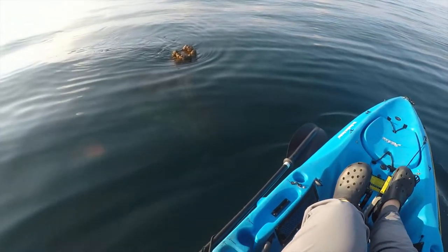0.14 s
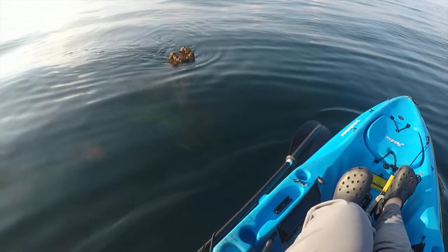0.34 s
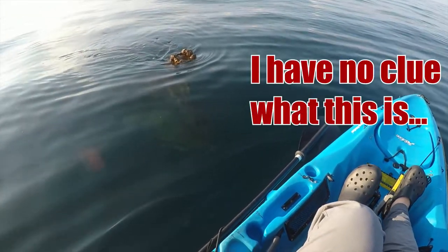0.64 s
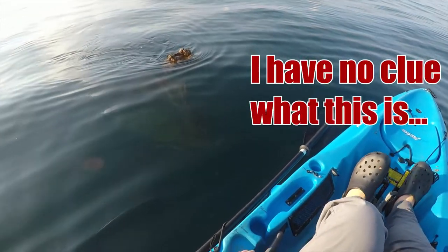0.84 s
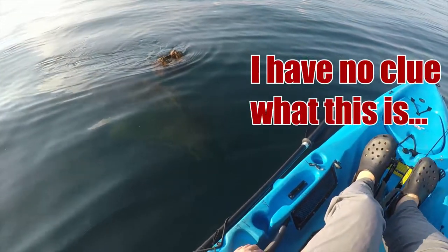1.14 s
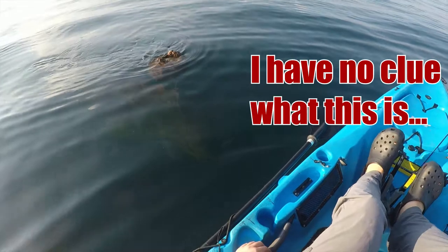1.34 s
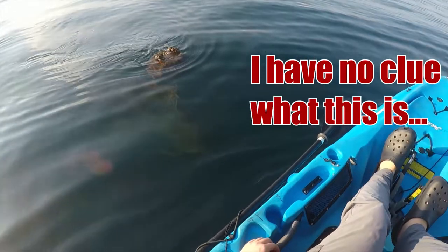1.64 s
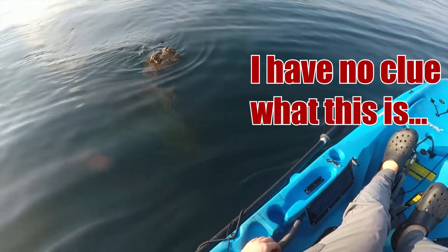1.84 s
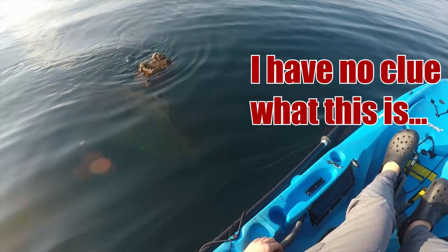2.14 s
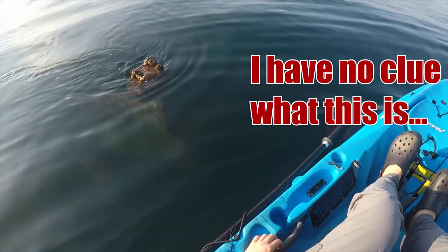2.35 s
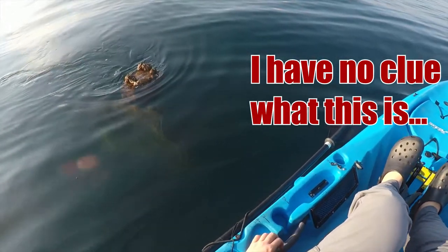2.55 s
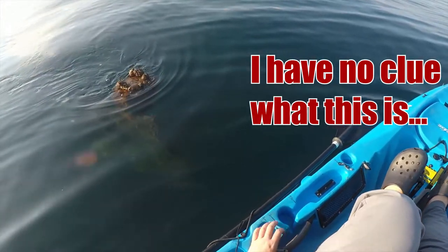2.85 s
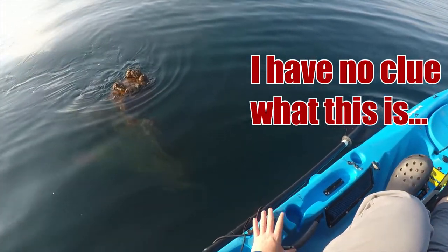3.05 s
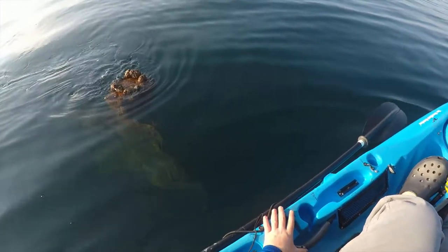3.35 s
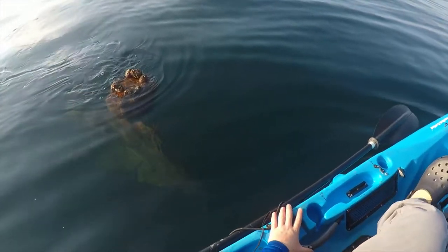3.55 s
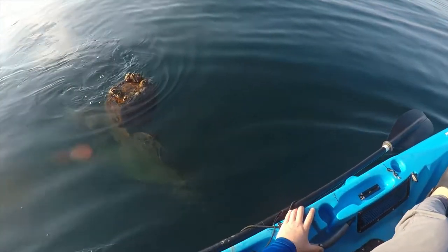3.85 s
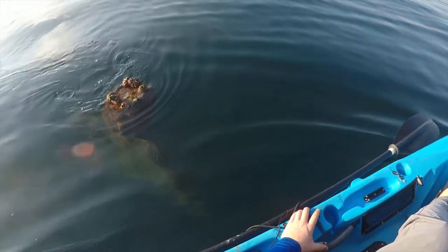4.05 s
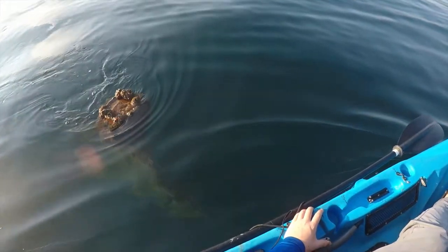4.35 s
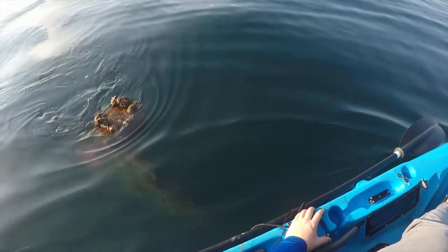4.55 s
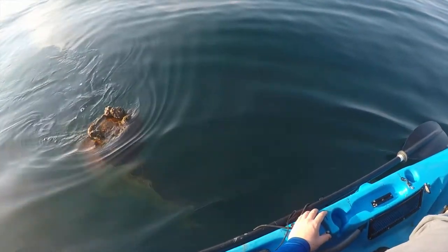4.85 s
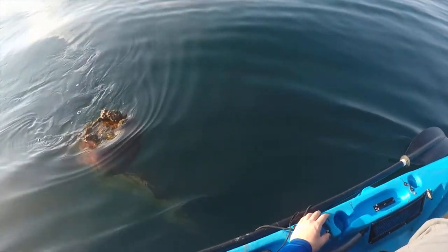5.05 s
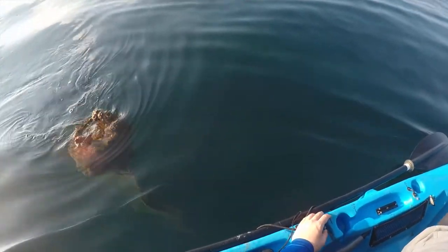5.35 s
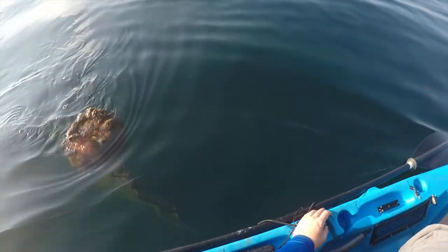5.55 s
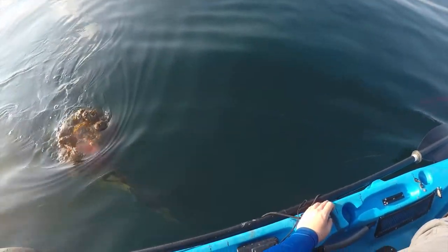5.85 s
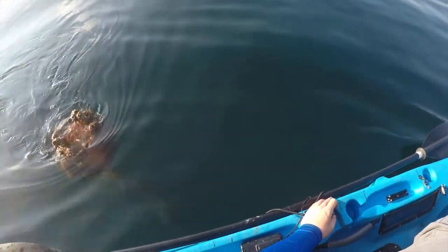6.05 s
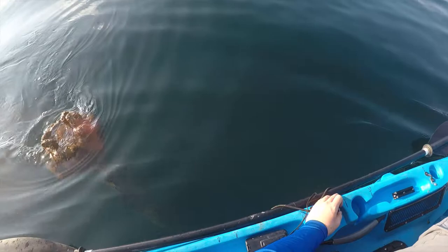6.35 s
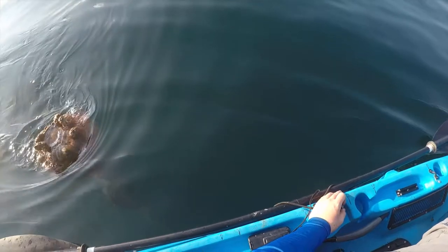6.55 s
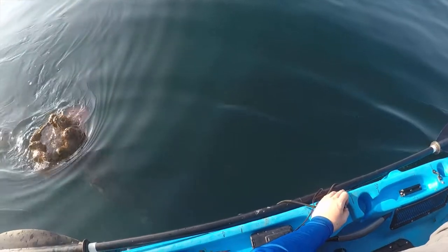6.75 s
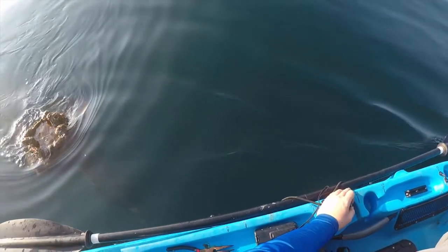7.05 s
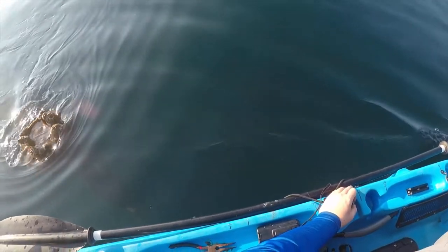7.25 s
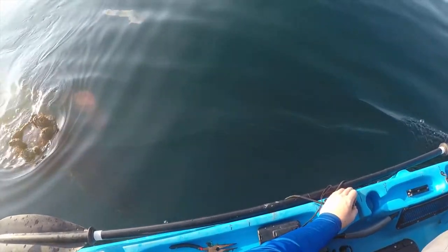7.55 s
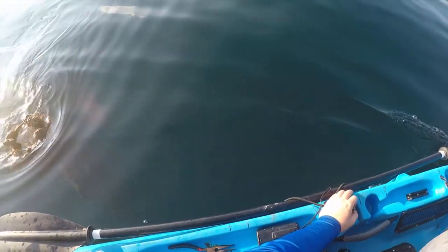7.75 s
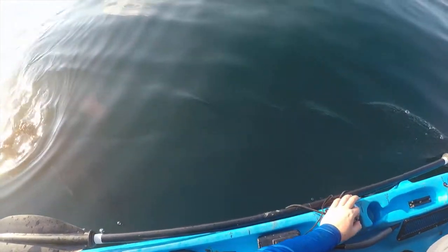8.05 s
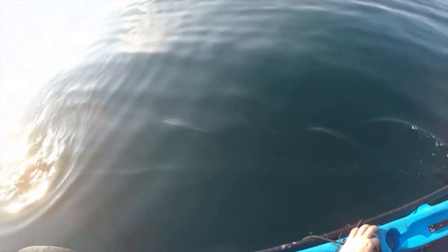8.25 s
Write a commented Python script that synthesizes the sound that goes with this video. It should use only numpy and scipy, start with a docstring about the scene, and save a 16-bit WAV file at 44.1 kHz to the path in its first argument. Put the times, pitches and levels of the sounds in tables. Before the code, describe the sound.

A plastic kayak rocks on calm water, its hull thumping softly amid drips and trickles, with a few creaks, a squeak and knocks.

```python
"""Hollow thumps, plops and drips round a plastic kayak rocking on calm water, heard from aboard.
Ripples trap air pockets that boom under the hull, and small bubbles ring along the waterline.
As weight shifts, the seat and gear creak in runs of stick-slip snaps, rubber squeaks over the deck
and gear knocks on the plastic. Faint open-air hiss and a low hull hum lie underneath."""
import sys
import numpy as np
from scipy import signal
from scipy.fft import rfft, irfft
from scipy.io import wavfile
from scipy.ndimage import uniform_filter1d

SR = 44100
rng = np.random.default_rng(int(sys.argv[2]) if len(sys.argv) > 2 else 0)


def transcribe(u):
    """Save the signal u as a 16-bit wav file named by the first command-line argument.

    u: samples, shape (n,) or (channels, n), limited to [-1, 1]; the rate is SR.
    q: integer samples, one column per channel.
    """
    v = np.clip(np.atleast_2d(u).T, -1, 1)
    q = np.round(v * 32767).astype(np.int16)
    wavfile.write(sys.argv[1], SR, q)


N = 370440

# ripples trapping air under the hull: (time [s], level [dB], pocket pitch [Hz])
LAPS = [(0.298, -25, 107.3), (.586, -22.5, 118.6), (.623, -26, 109), (.815, -29.5, 106.5),
        (0.878, -23.5, 117.6), (1.756, -33, 147.6), (1.784, -24.5, 92.3), (1.936, -23.5, 186),
        (1.979, -22.5, 100), (2.203, -26, 135), (2.245, -20.5, 143), (2.314, -24.5, 91),
        (3.052, -22.5, 116.4), (3.093, -26, 96.5), (3.205, -21.5, 163.5), (3.24, -24, 129.6),
        (3.416, -23.5, 118.3), (3.454, -21.5, 163.4), (3.509, -23.5, 123.6), (3.868, -24.5, 110.4),
        (3.991, -16.5, 95.9), (4.262, -28.5, 149.5), (4.289, -22.5, 101.5), (4.376, -26.5, 125.5),
        (4.435, -20, 165.6), (4.476, -23.5, 98.2), (4.612, -22.5, 96.3), (4.659, -25, 153),
        (5.469, -24, 193), (5.515, -22.5, 116.2), (5.696, -26, 179.5), (6.123, -30, 236),
        (6.369, -20, 97.3), (6.511, -22, 197.6), (6.567, -21, 127.4), (6.834, -25.5, 191),
        (6.862, -25.5, 108.7), (7.557, -28.5, 115.5), (7.737, -19.5, 153), (7.77, -24, 104.3)]
# the boom of the hollow hull: (frequency [Hz], level [dB], t60 [s])
HULL_RESONANCES = [(87, 2.5, 0.34), (118.9, -8, 0.82), (187, 1, 0.15), (240, -8, 0.041)]
# the deck scatters every snap along the same paths to each microphone
DECK_SCATTER = rng.standard_normal((2, 2048))


def thumps(hull_db=-12, slap_db=-8, slap_lead_s=0.00848, slap_pull_hz=370, side_db=-1.9):
    """Each lap traps air under the hull, which booms after it; a smaller pocket slaps just ahead."""
    out, hull = np.zeros((2, N)), ring(HULL_RESONANCES)
    for s, db, hz in LAPS:
        peak_s, thump = pocket(hz, cycles=1.39, rise=1.26, glide=-0.12)
        add(out, s - peak_s, amp(db) * place(thump, side_db, rng.normal(0, 0.37)))
        add(out, s, amp(db + hull_db) * place(hull, side_db))
        slap_hz = np.sqrt(hz * slap_pull_hz) * rng.uniform(0.912, 1.237)
        slap = pocket(slap_hz, cycles=5.14, rise=0.53, glide=-0.18)[1]
        slap = place(slap, rng.normal(0, 3), rng.normal(0, 0.56))
        add(out, s - peak_s - slap_lead_s, amp(db + slap_db) * slap)
    return out


def pocket(hz, cycles, rise, glide):
    """An air pocket swells and dies over some cycles as its pitch drifts; returns peak time and tone."""
    age = np.arange(int(6 * (cycles + rise) * SR / hz)) * hz / SR  # in cycles
    shape = (1 - np.exp(-(age / rise) ** 2)) * np.exp(-age / cycles)
    turns = np.cumsum(hz * (1 + glide * np.tanh((age - rise) / (2 * cycles)))) / SR
    return np.argmax(shape) / SR, shape / shape.max() * np.exp(2j * np.pi * turns)


def bubbles(cycles=4.4, plop_db=3, snap_db=-9, droplet_db=-11, mic_delay_s=0.00018):
    """Close water: bubbles open with a tiny snap and ring, drops tick, squeezed air gurgles upward."""
    # the nearest plops and drips: (time [s], level [dB], pitch [Hz], left-right [dB])
    plops = [(0.911, -34, 528, 11), (0.941, -40.5, 2730, 2), (1.118, -36.5, 1490, 2), (1.447, -37, 2700, 2),
             (1.531, -28, 434, 11), (1.57, -29, 1164, 3.5), (3.435, -33, 552, -12), (3.578, -40.5, 1150, 6),
             (3.751, -34.5, 800, 10), (5.716, -32.5, 1055, -14), (5.739, -34.5, 2730, -9),
             (6.024, -35.5, 1810, -12), (6.212, -32, 1144, -11), (6.49, -37.5, 1560, 4),
             (6.608, -29.5, 954, 17), (6.673, -34, 1020, 21), (6.761, -33.5, 3870, -3),
             (6.775, -34, 2520, 5), (6.836, -34.5, 2100, 5), (7.348, -38.5, 3500, -3),
             (7.49, -33.5, 1500, 5), (7.972, -33.5, 740, 21), (8.251, -36, 1920, -1),
             (8.274, -34.5, 2470, -6)]
    # EQ that brightens a plastic snap into that of a drop: (frequency [Hz], gain [dB])
    drop_eq = [(900, -6.5), (2500, 1), (4500, 1)]
    # drops ticking on the hull and the water: (time [s], level [dB])
    drips = [(1.509, -40), (1.615, -45), (1.683, -42.5), (3.145, -39.5), (4.816, -40), (6.608, -33.5),
             (6.778, -35.5), (6.842, -35), (6.93, -40), (7.285, -39), (7.455, -39)]
    # air pockets squeezed shut:
    # (time [s], length [s], level [dB], first pitch [Hz], last pitch [Hz], left-right [dB])
    gurgles = [(1.529, .044, -42, 490, 1074, 18), (5.626, .042, -24.5, 414, 672, 20),
               (8.359, .02, -31.5, 846, 1100, -14)]
    out = np.zeros((2, N))
    for s, db, hz, side_db in plops:
        peak_s, tone = pocket(hz, cycles * (hz / 1000) ** 0.6, rise=1.7, glide=rng.uniform(-0.16, .17))
        tone = tone * (1 + 0.42 * wobble(len(tone), hz / 2))  # the surface shakes as it rings
        lead = 2 * np.pi * hz * mic_delay_s * np.tanh(side_db / 12)
        add(out, s - peak_s, amp(db + plop_db) * place(tone, side_db, lead))
        add(out, s - peak_s, amp(db + snap_db) * colour(snap(decay_s=0.0013, linger=0.06), drop_eq))
        for _ in range(2):  # droplets fall beside it
            droplet = pocket(rng.uniform(1200, 3600), cycles, rise=0.94, glide=0)[1]
            lands_s = s + rng.normal(0, 0.028)
            droplet = place(droplet, rng.normal(0, 4), rng.normal(0, 0.65))
            add(out, lands_s, amp(db + droplet_db) * droplet)
    for s, db in drips:
        tick = colour(snap(decay_s=0.0016, linger=0.06), [(900, -7), (2500, 1), (4500, -1)])
        add(out, s - .001, amp(db) * tick)
    for s, length, db, first_hz, last_hz, side_db in gurgles:
        progress = np.linspace(0, 1, int(length * SR))
        hz = first_hz * (last_hz / first_hz) ** progress * (1 + 0.083 * wobble(len(progress), 760))
        gurgle = np.sin(np.pi * progress) * np.exp(2j * np.pi * np.cumsum(hz) / SR)
        add(out, s, amp(db) * place(gurgle, side_db, 1.0))
    return out


def creaks(hull_db=-10):
    """Strained plastic slips singly, then so fast that the snaps merge into a rasp; gear clicks too."""
    # lone clicks of gear on the deck: (time [s], level [dB], treble lift [dB])
    clicks = [(0.36, -36, 2), (1.278, -28, -13), (1.338, -29.5, -7), (0.923, -47, 28), (5.386, -38.5, 21)]
    # slips too fast to count, one list a slide: (time [s], level [dB], slips [1/s], brightness [0-1])
    slides = [
        [(2.56, -47, 150, 0.5), (2.795, -50, 120, 0.5), (2.803, -33.5, 120, 0.2), (2.91, -37, 190, .15),
         (2.95, -43, 170, .15), (3.06, -50, 140, .3)],
        [(2.142, -33.5, 260, 0.1), (2.21, -32, 300, 0.1), (2.235, -39, 230, 0.1)],
        [(3.9, -45, 224, 0), (4.03, -45.5, 290, 0.7), (4.08, -36, 250, 0.68), (4.135, -49, 227, 0.6)],
        [(4.507, -28, 190, 0.1), (4.515, -36, 295, 0), (4.54, -36.5, 240, 0.6), (4.562, -53, 280, 0.3)],
    ]
    out = np.zeros((2, N))
    hull = place(ring(HULL_RESONANCES[1:]), 0)
    for s, db, decay_s, sweep_s, bite_db in slips():
        add(out, s, amp(db + hull_db) * hull)  # each slip nudges the upper modes of the hull
        tick = colour(snap(decay_s, sweep_s, linger=0.15), [(1400, 0.0014), (2850, bite_db), (5500, 0)])
        add(out, s - sweep_s / 2, amp(db + rng.normal(0, 0.04)) * tick)
    for s, db, treble_db in clicks:
        click = colour(snap(decay_s=0.0029, linger=0.24), [(2000, 0), (6500, treble_db)])
        add(out, s - .001, amp(db) * click)
    for rows in slides:
        t = np.arange(rows[0][0], rows[-1][0], 1 / SR)
        db, per_s, bright = curve(rows, t)
        slip_count = np.cumsum(per_s * np.exp(.2 * wobble(len(t), 200))) / SR
        rasp = np.zeros((2, len(t)))
        for onset in np.flatnonzero(np.diff(np.floor(slip_count), prepend=-1)):
            add(rasp, onset / SR, snap(decay_s=0.0036) * rng.uniform(0.39, 1))
        sharp_rasp = colour(rasp, [(1000, -11.5), (2800, -6.5), (3800, 4.5), (5100, 7.5)])
        add(out, t[0], amp(db) * unit((1 - bright) * unit(rasp) + bright * unit(sharp_rasp)))
    return out


def slips():
    """Yields the single slips of each creak, their gaps shrinking or growing steadily."""
    # strained plastic ticking in runs: (time [s], length [s], slips [1/s], speeding up [-1 to 1],
    # first level [dB], last level [dB], slip decay [s], bass lag [s], bite near 3 kHz [dB])
    runs = [(0.058, .213, 28, .32, -31.5, -34.5, 0.0046, 0.0018, 3),
            (2.505, .094, 54, -.05, -32.5, -28.5, 0.0055, 0.002, 2.5),
            (2.629, .154, 32.5, .19, -26, -25.5, 0.0058, 0.0036, 1.5),
            (2.654, .035, 28, 0, -34, -33, 0.0014, .002, 4),
            (3.909, .105, 86, -.14, -27.5, -25.5, 0.003, .0055, -7)]
    for s, length, per_s, hurry, first_db, last_db, decay_s, sweep_s, bite_db in runs:
        for progress in np.linspace(0, 1, 1 + round(length * per_s)):
            onset_s = s + length * progress * (1 + hurry * (1 - progress))
            yield onset_s, first_db + progress * (last_db - first_db), decay_s, sweep_s, bite_db


def snap(decay_s, sweep_s=0.002842, linger=0.32, linger_s=0.014, bend_hz=1300, variety=.45):
    """One snap through the plastic: bending waves bring the treble first, then the panel rings out."""
    # the ring of the deck panel: (frequency [Hz], level [dB], t60 [s])
    deck_modes = [(744, -2, 0.037), (868, -2, 0.051), (1122, -1, 0.047), (1512, -3, 0.028),
                  (2083, -1.5, 0.055), (2470, -7, 0.027), (2930, -5.5, 0.033)]
    # the tone of the plastic: (frequency [Hz], gain [dB])
    plastic_eq = [(100, -7.5), (450, -2), (660, 1.5), (860, 3.5), (1020, 0), (1250, 5), (1600, 1),
                  (1800, -4.5), (2070, -1), (2360, -8), (2850, -1.5), (3200, -3.5), (3500, -9), (4000, -10),
                  (4450, -13.5), (5100, -19.5), (6200, -39)]
    size = DECK_SCATTER.shape[1]
    t, hz = np.arange(size) / SR, np.fft.rfftfreq(size, 1 / SR)
    fade = np.exp(-t / decay_s) + linger * np.exp(-t / linger_s)
    burst = (DECK_SCATTER + variety * rng.standard_normal((2, size))) * fade
    burst = burst + 0.47 * burst[::-1]  # each microphone also hears the other's paths
    burst += amp(-15) * ring(deck_modes, spread=0.0053)[:size].real
    burst[:, 0] += 1.2  # the direct hit
    delay_s = sweep_s * np.sqrt(bend_hz / (hz + bend_hz / 2))
    dispersion = np.exp(-2j * np.pi * np.cumsum(delay_s) * hz[1])
    sound = colour(irfft(flat_spectrum(burst) * dispersion), plastic_eq)
    return sound / np.sqrt((sound ** 2).sum(1, keepdims=True) / (0.0031 * SR))  # equal energy per snap


def squeaks(jitter=0.055, flutter_db=6, level_db=1, buzz_db=6, purity_db=-4):
    """Rubber sticks and slips; the deck brings out the second partial, more so as the grip tightens."""
    # rubber dragging over the deck, one list a squeak: (time [s], level [dB], pitch [Hz])
    drags = [
        [(2.141, -40.5, 383), (2.146, -31, 380.6), (2.175, -29, 371.5), (2.186, -23, 372.6), (2.195, -29, 363),
         (2.203, -10.5, 373), (2.213, -17, 384), (2.23, -42, 410)],
        [(3.012, -55, 2040), (3.02, -37, 2080), (3.035, -49, 2050), (3.08, -52, 1970)],
        [(4.512, -41.5, 342), (4.529, -31.5, 601), (4.547, -40.5, 960), (4.558, -39, 1485)],
    ]
    # the squeak's harmonics: (multiple of the pitch, level [dB])
    partials = [(1, -30.5), (2, 3), (3, -12.5), (4, -12), (6, -19), (8, -16.5), (10, -24), (12, -25)]
    out = np.zeros((2, N))
    for rows in drags:
        t = np.arange(rows[0][0], rows[-1][0], 1 / SR)
        db, hz = curve(rows, t)
        loose = 1 - 0.5 * amp(db - db.max())  # the grip steadies as it tightens
        turns = np.cumsum(hz * (1 + jitter * loose * wobble(len(t), 900))) / SR
        upper_db = purity_db + buzz_db * loose
        tone = np.zeros(len(t))
        for k, partial_db in partials:
            gain = amp(partial_db + upper_db * (k > 2) + flutter_db * loose * wobble(len(t), 300))
            rolloff = 1 + (k * hz / 3200) ** 4
            tone += gain / rolloff * np.cos(2 * np.pi * (k * turns + rng.random()))
        add(out, t[0], amp(db + level_db) * tone)
    return out


def from_deck(x):
    """Carries a sound from the creaking spot to the microphones, each band with its own stereo image."""
    # the path over the deck: (frequency [Hz], left-right [dB], left phase lead [rad])
    deck_path = [(150, -3, 0.5), (620, -8, 1.8), (1000, -7.5, 0.75), (1280, -12, 0.9), (1750, -7.5, 0.36),
                 (2070, -5, 0), (2400, -1, -1.9), (2850, -1, -2), (3500, -4, -2.5), (4400, -12.5, -2)]
    side_db, lead = curve(deck_path, np.fft.rfftfreq(N, 1 / SR))
    half = np.array([[.5], [-.5]])
    gains = amp(half * side_db)
    gains /= np.sqrt((gains ** 2).mean(0))
    return irfft(rfft(x) * gains * np.exp(1j * half * lead), N)


def knocks(body_db=-5, scuff_db=-13, scuff_lead_s=.006, hull_db=-20):
    """Gear bumps the boat: a short scuff, then the dull ring of the deck and a faint hull boom."""
    # each bump: (time [s], level [dB])
    bumps = [(3.818, -13), (3.823, -19), (3.981, -28), (4.633, -22.5), (4.643, -22)]
    # the dull ring of the struck deck: (frequency [Hz], level [dB], t60 [s])
    body_modes = [(204, 0.5, .07), (345, -0.5, 0.053), (529, -1.5, 0.045), (823, 0, 0.029),
                  (1025, -5.5, .055), (1310, -12.5, .055), (2137, -25.5, .06)]
    out = np.zeros((2, N))
    for s, db in bumps:
        add(out, s - scuff_lead_s, amp(db + scuff_db) * snap(decay_s=0.0041) * amp([[-2], [2]]))
        body = amp(body_db) * ring(body_modes, spread=0.058) + amp(hull_db) * ring(HULL_RESONANCES)
        add(out, s, amp(db) * place(body, -1.5, 0.18))
    return out


def lapping(slosh_db=-3, trickle_db=-5, murmur_db=-50, splash_db=-1, stir_db=-28.5, stir_s=0.022):
    """Ripples slosh, trickle and splash; each lap stirs more slosh, and the hull murmurs with it."""
    # how busy the ripples are: (time [s], slosh [dB], trickle [dB])
    ripples = [(0, -51, -55.5), (.5, -47.5, -52), (.87, -37, -55), (1.05, -55, -54.5), (1.5, -58, -52),
               (2, -72, -66), (3.15, -57, -54), (3.45, -38, -46), (3.65, -51, -51.5), (4.4, -42, -49.5),
               (4.8, -48.5, -52), (5.25, -42.5, -52), (5.45, -40, -53), (5.68, -37.5, -44.5),
               (5.95, -49.5, -45.5), (6.13, -37, -45), (6.6, -43, -45.5), (7.1, -57.5, -49.5),
               (7.5, -48, -48.5), (7.85, -45, -50), (8.39, -43, -42.5)]
    # thin sheets of breaking water: (frequency [Hz], gain [dB])
    splash_eq = [(200, -26.5), (450, 6.5), (1000, -4.5), (2200, -11), (4500, -18), (7000, -36.5)]
    t = np.arange(N) / SR
    slosh_level, trickle_level = amp(curve(ripples, t))
    steps = t[::100]
    stir_power = sum(amp(db + stir_db) ** 2 * np.exp(-((steps - s) / stir_s) ** 2) for s, db, _ in LAPS)
    slosh_level = np.sqrt(slosh_level ** 2 + np.interp(t, steps, stir_power))
    clumps = unit(amp(2.8 * wobble(N, 40)))
    splash = unit(colour(rng.standard_normal((2, N)) * amp(2.8 * wobble(N, 200)), splash_eq))
    slosh = swarm(242.1, 782.4, per_s=190, cycles=3.86, scatter_db=5)
    murmur = swarm(85, 260, per_s=80, cycles=2.8, scatter_db=2.5)
    trickle = swarm(799, 3000, per_s=340, cycles=3.76, scatter_db=4)
    return (slosh_level * amp(slosh_db) * slosh
            + unit(slosh_level) * amp(murmur_db) * murmur
            + trickle_level * clumps * (amp(trickle_db) * trickle + amp(splash_db) * splash))


def swarm(low_hz, high_hz, per_s, cycles, scatter_db, mic_delay_s=0.000084, pitches=48):
    """Countless small bubbles ring all round the waterline, at rms 1."""
    out = np.zeros((2, N))
    for hz in np.geomspace(low_hz, high_hz, pitches):
        tone = pocket(hz, cycles * rng.uniform(0.5, 2.33), rise=0.64, glide=rng.uniform(-0.22, 0.24))[1]
        tone = tone * (1 + .5 * wobble(len(tone), hz / 2))
        side = rng.uniform(-0.72, 1)
        grain = place(tone, 8 * side, 2 * np.pi * hz * mic_delay_s * side) * (low_hz / hz) ** 0.2
        for when, faintness in rng.random((200, 2))[:int(per_s * N / SR / pitches)]:
            add(out, when * N / SR, grain * amp(-scatter_db * np.log(faintness + 0.019)))
    return unit(out)


def air(level_db=-40.5, swell_db=1):
    """Faint open-air hiss over the steady low hum of the hollow hull."""
    # hum and hiss: (frequency [Hz], gain [dB])
    air_eq = [(15, -53.5), (25, -19), (62, -3), (102, -2), (155, -13), (190, -11), (253, -17.5),
              (628, -22), (1250, -33), (2070, -35), (4660, -36), (6670, -43.5), (7520, -51.5),
              (9780, -85), (16500, -120)]
    # how alike the two sides are: (frequency [Hz], coherence [0-1])
    likeness = [(60, 0.69), (150, 0.78), (300, 0), (700, 0), (2000, 0.14), (7000, 0)]
    left, unrelated = rfft(rng.standard_normal((2, N)))
    coherence = read(likeness, np.fft.rfftfreq(N, 1 / SR))
    right = coherence * left + np.sqrt(1 - coherence ** 2) * unrelated
    noise = colour(irfft(np.array([left, right]), N), air_eq)
    return amp(level_db + swell_db * wobble(N, 3.82)) * unit(noise) * amp([[-.7], [.7]])


def ring(modes, spread=0):
    """Damped modes after one blow, each detuned at random by the fraction spread."""
    t = np.arange(SR // 3) / SR
    return -1j * sum(amp(db - 60 * t / t60)
                     * np.exp(2j * np.pi * hz * (1 + spread * rng.standard_normal()) * t)
                     for hz, db, t60 in modes)


def place(tone, side_db, lead=0):
    """Pans a complex tone: the left is side_db louder and lead radians ahead."""
    gains = amp(np.array([[side_db], [-side_db]]) / 2)
    return (unit(gains) * np.exp(np.array([[.5j], [-.5j]]) * lead) * tone).real


def wobble(size, hz):
    """Smooth random drift of rms about 1 that changes hz times a second."""
    return np.interp(np.arange(size) * hz / SR, np.arange(size), rng.standard_normal(size)) * np.sqrt(1.5)


def colour(x, points):
    """Equalises x with a curve of (frequency [Hz], gain [dB])."""
    return irfft(rfft(x) * amp(read(points, np.fft.rfftfreq(x.shape[-1], 1 / SR))), x.shape[-1])


def flat_spectrum(x, bins=25):
    """The spectrum of x with its broad humps evened out and its fine ripple kept."""
    spectrum = rfft(x)
    return spectrum / np.sqrt(uniform_filter1d(abs(spectrum) ** 2, bins) + 1e-12)


def read(points, hz):
    """Reads a spectrum on a log-frequency axis."""
    f, value = np.transpose(points)
    return np.interp(np.log(hz + 1), np.log(f + 1), value)


def curve(rows, at):
    """Interpolates the other columns of a table along its first."""
    axis, *columns = np.transpose(rows)
    return [np.interp(at, axis, column) for column in columns]


def add(mix, s, sound):
    """Mixes a sound in at time s."""
    part = mix[:, max(round(s * SR), 0):][:, :sound.shape[-1]]
    part += sound[..., :part.shape[1]]


def amp(db):
    """Decibels to gain."""
    return 10 ** (np.asarray(db) / 20)


def unit(x):
    """Scales to rms 1."""
    return x / np.sqrt(np.mean(x ** 2) + 1e-20)


def scene():
    """Water, boat and air together."""
    return thumps() + bubbles() + lapping() + from_deck(creaks() + squeaks()) + knocks() + air()


def record(dry):
    """The microphone loses the deep bass and everything above 7.5 kHz."""
    mic_eq = [(30, -23.5), (50, -20.5), (62, -26), (75, -0.5), (5000, -1.5), (6000, -4.5), (7400, -3)]
    lowpass = signal.firwin(511, 7500, window=("kaiser", 9), fs=SR)
    return signal.oaconvolve(colour(dry, mic_eq), lowpass[None], "same")


dry = scene()
out = record(dry)
transcribe(out)
```